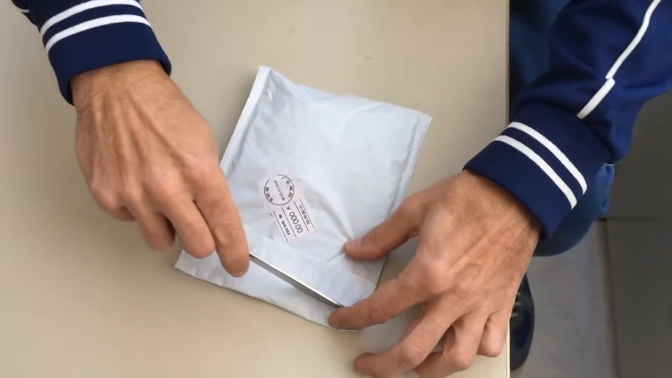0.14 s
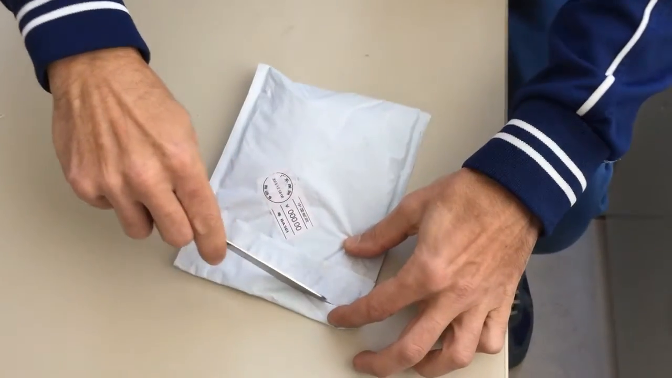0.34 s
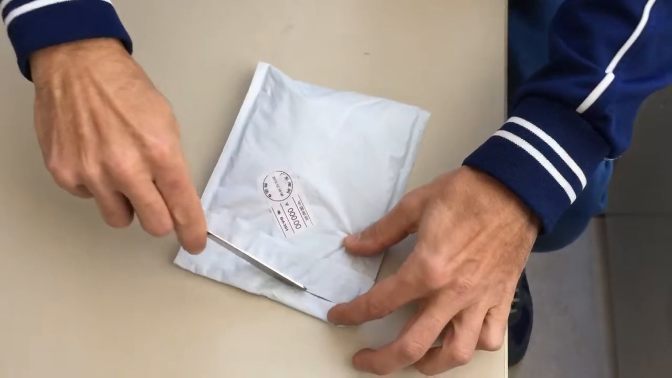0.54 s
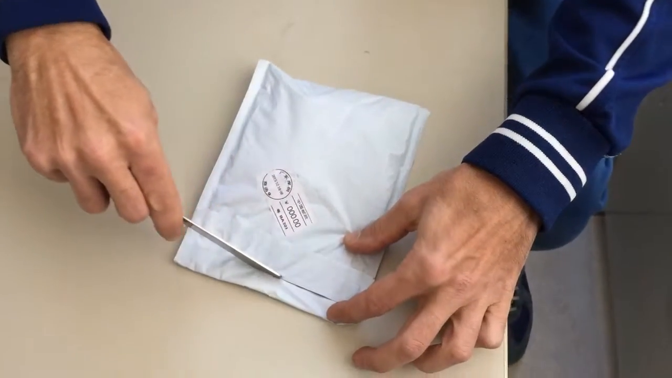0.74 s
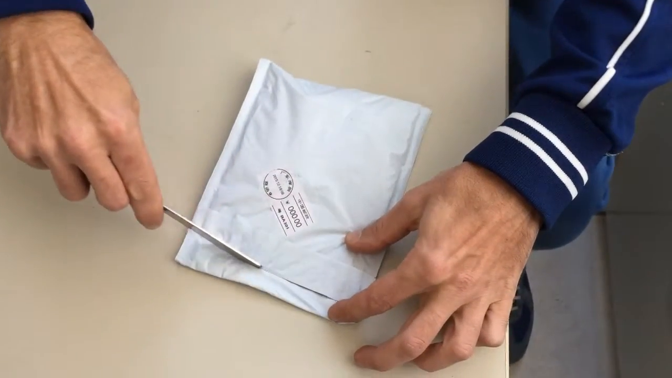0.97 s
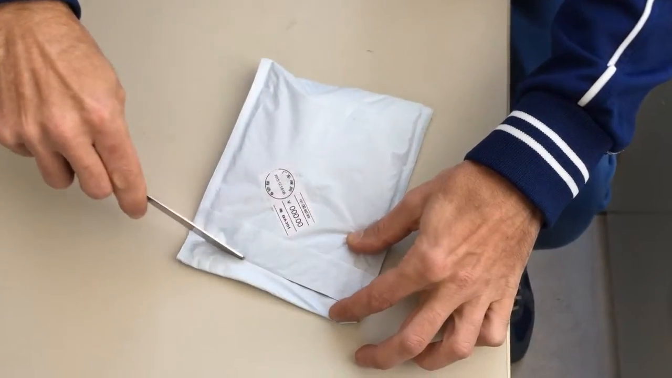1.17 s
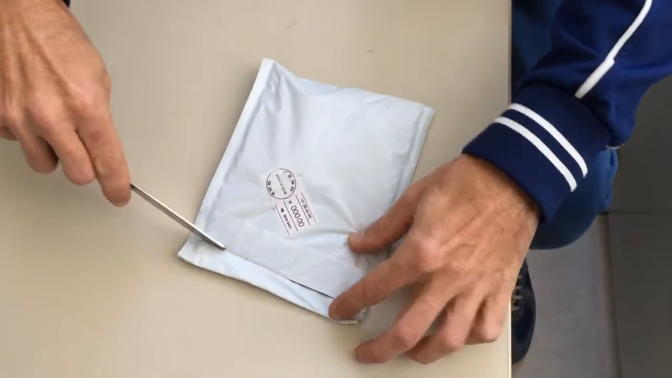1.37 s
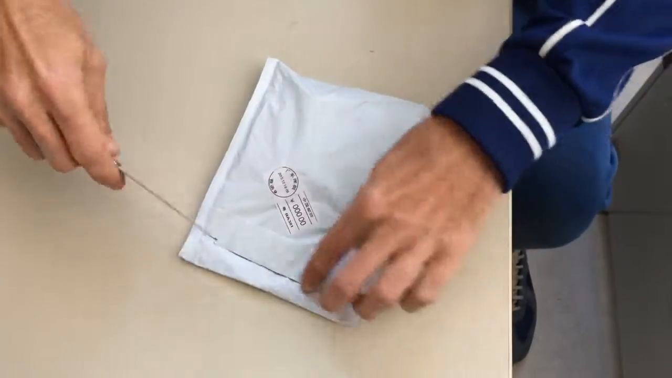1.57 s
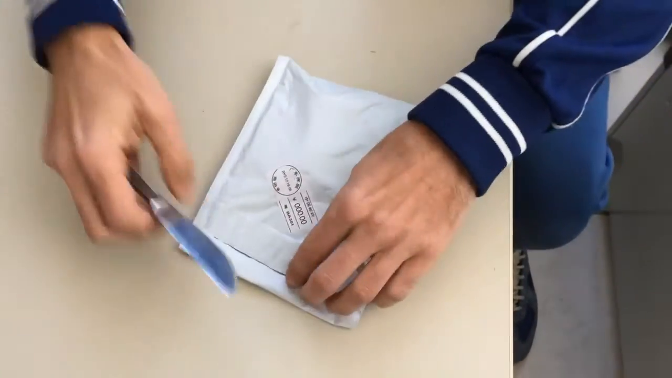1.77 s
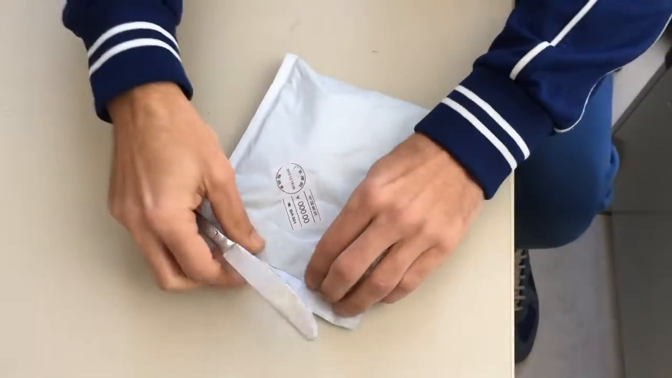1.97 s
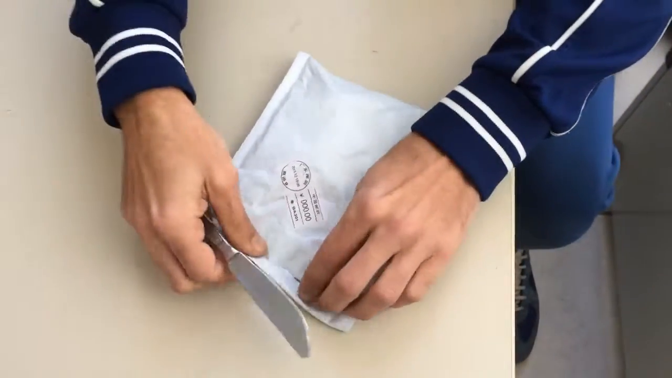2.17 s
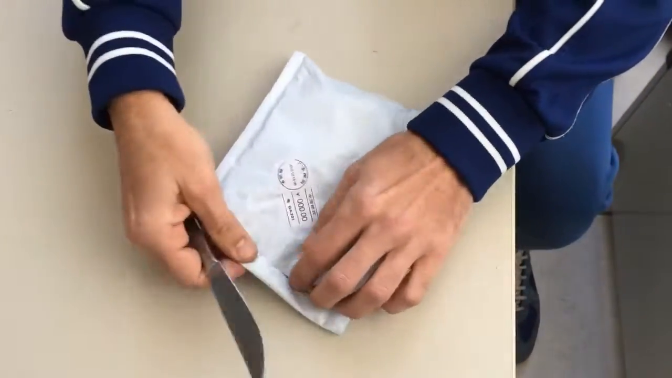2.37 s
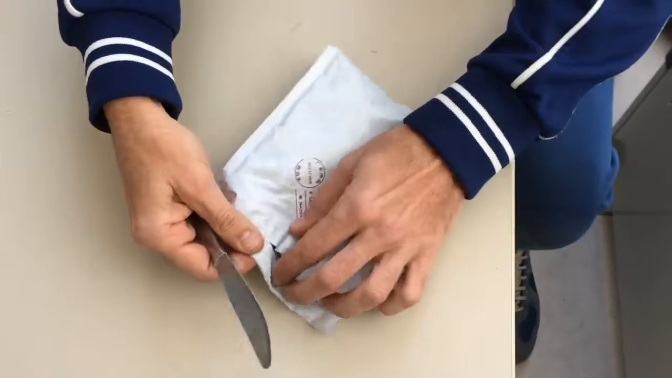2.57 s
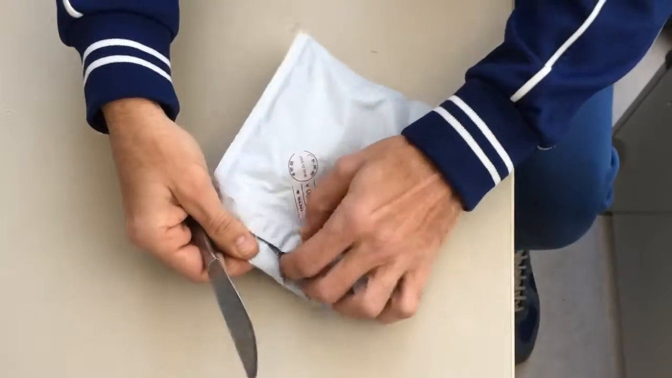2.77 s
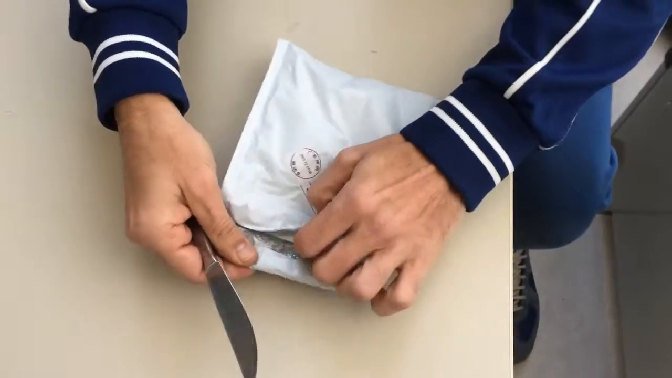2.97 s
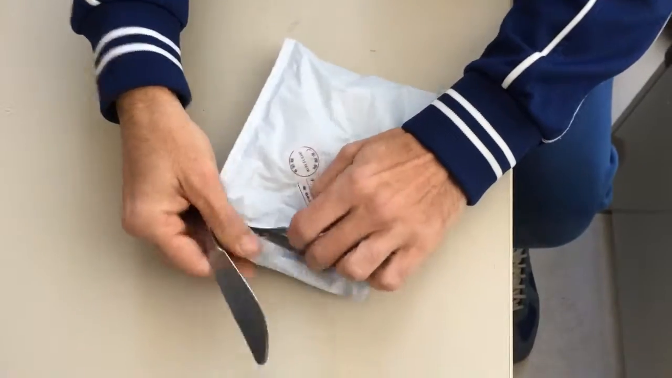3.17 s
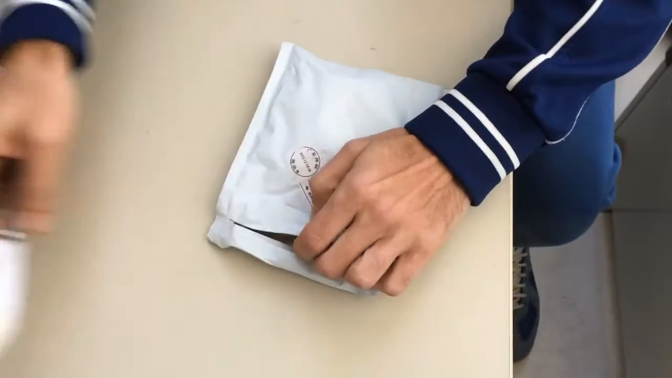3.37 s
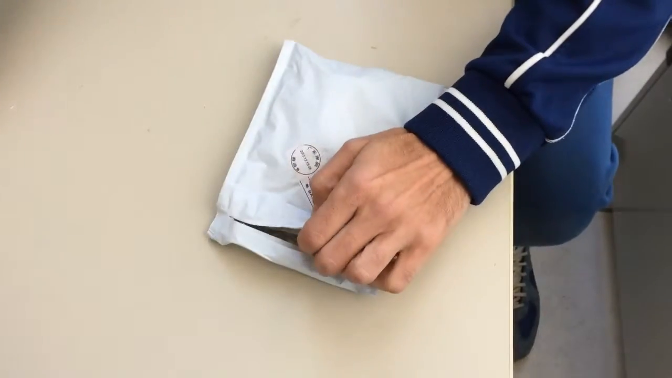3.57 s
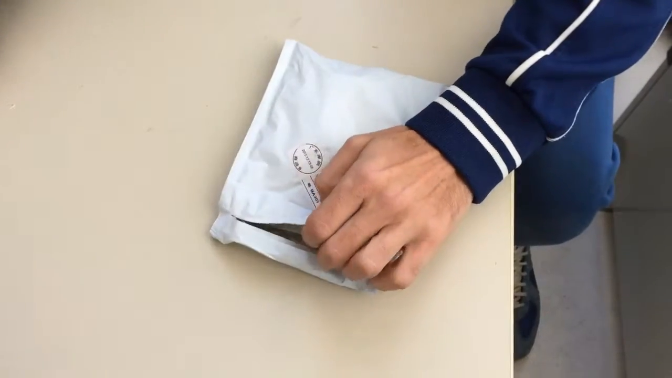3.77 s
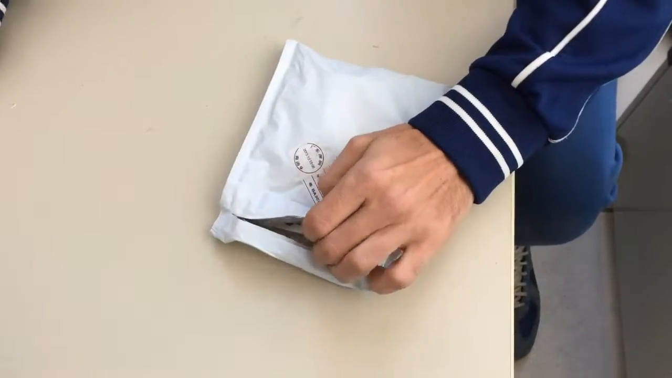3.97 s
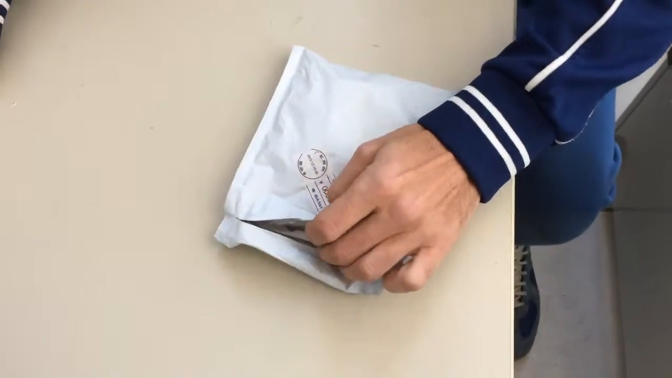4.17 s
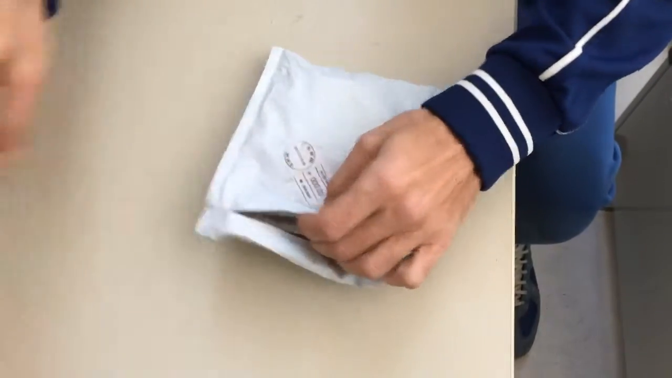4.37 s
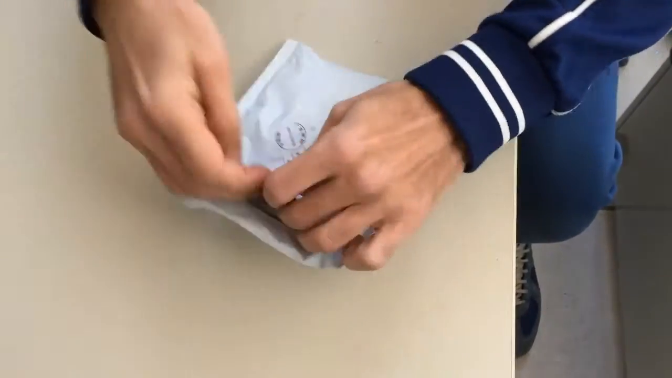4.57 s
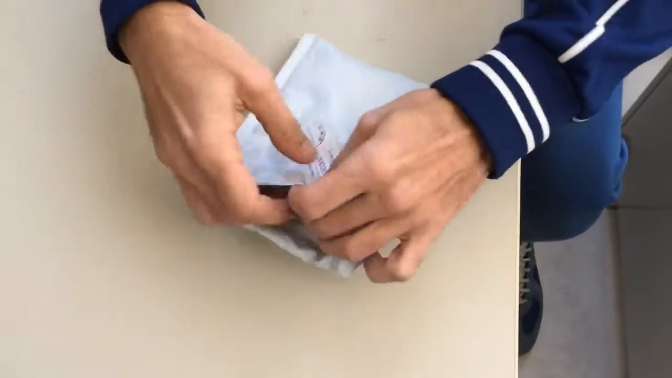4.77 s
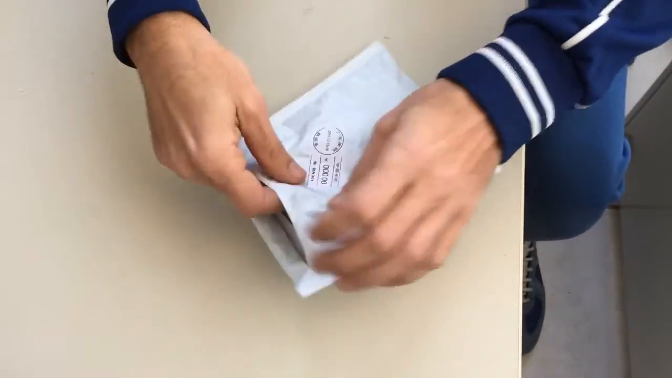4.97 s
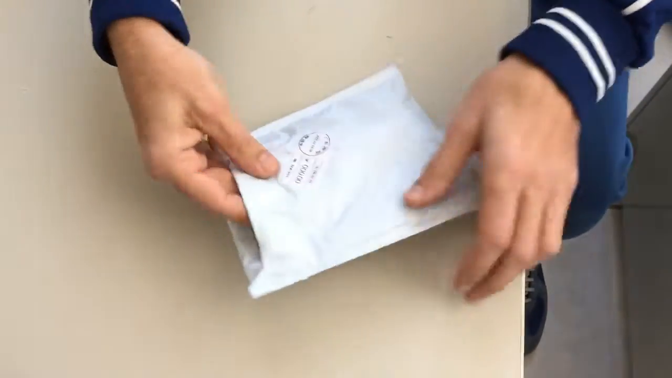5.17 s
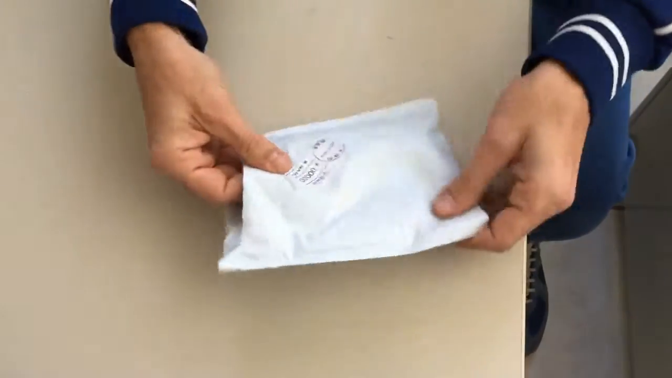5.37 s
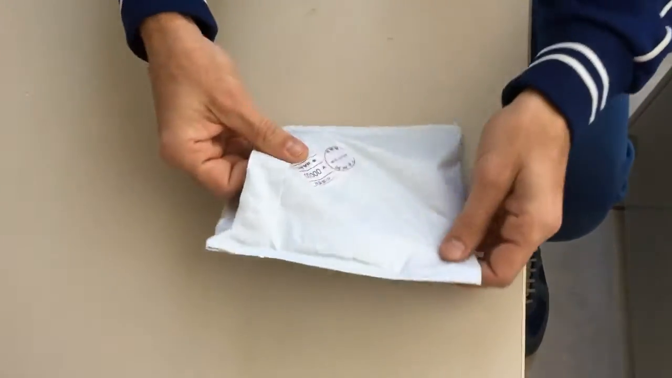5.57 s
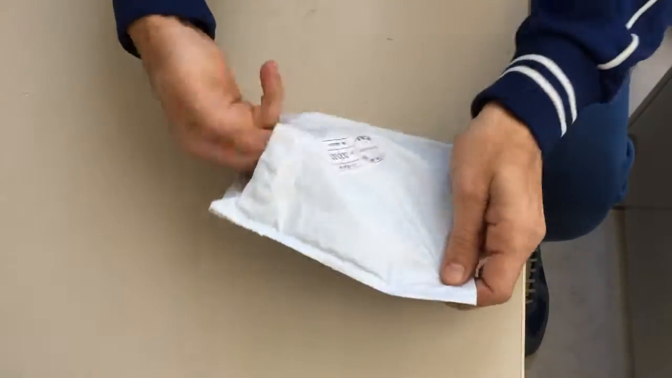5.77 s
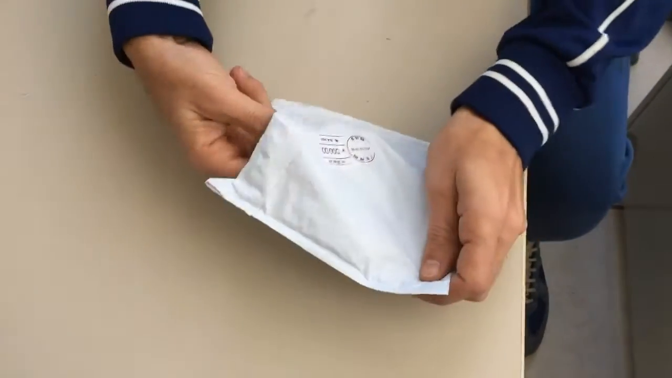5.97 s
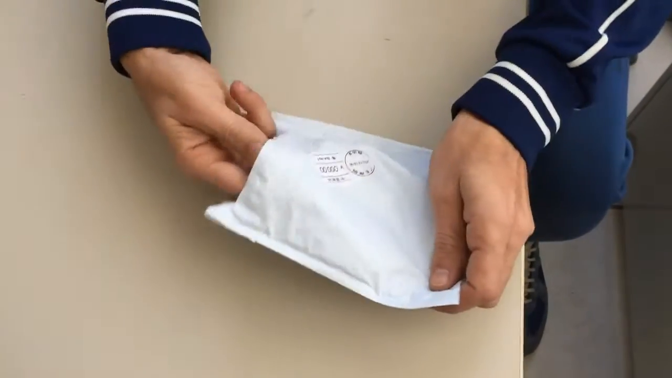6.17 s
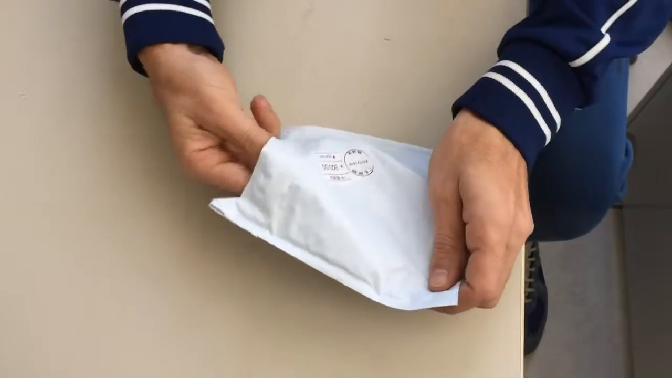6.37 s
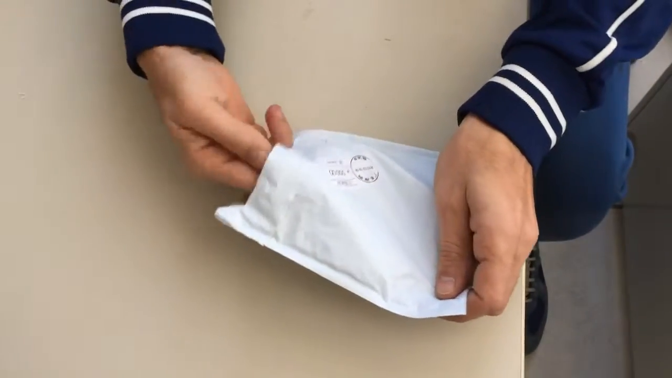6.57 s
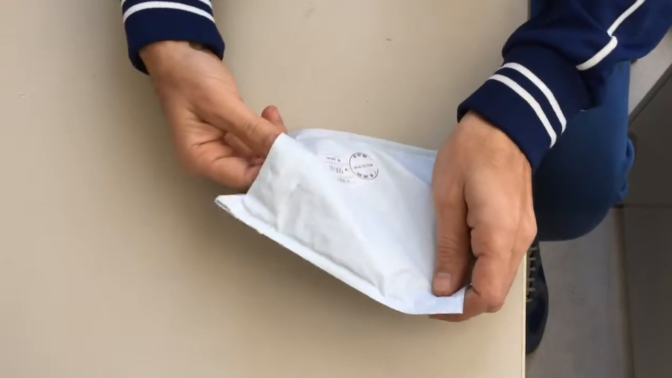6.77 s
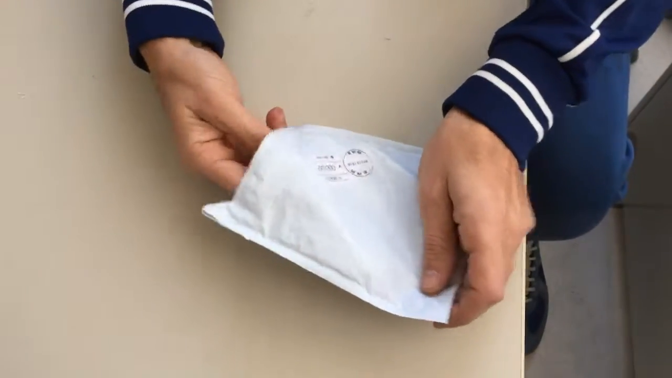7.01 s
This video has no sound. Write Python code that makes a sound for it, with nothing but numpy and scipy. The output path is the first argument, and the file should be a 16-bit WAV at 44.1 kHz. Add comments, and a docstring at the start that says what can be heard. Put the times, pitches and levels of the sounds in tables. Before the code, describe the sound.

Close up in a small hard room, a table knife slits a padded plastic envelope with faint rasps and tiny ticks. Hands then pull the film open with sharp, dense crackles. A near-quiet gap follows, broken by light taps and a hard, bright clack as the knife lands on the desk. Looser, fuller crinkling resumes and thins out as a hand feels inside. A faint low hum throbs beneath.

```python
"""Slitting a padded plastic envelope

Hands slit the envelope on a desk, lay the table knife down with a few taps and a clack and reach inside.
The blade rasps along the seam by stick-slip. Tiny creases crackle as they buckle and larger ones snap,
with a deeper colour once the film is open and slack. Struck steel and desk top ring as sums of damped modes;
each tap of the knife also gets a click made like a snap.
A small hard room answers with dense decaying reflections, over a low throbbing hum of two beating tones."""
import sys
import numpy as np
from scipy import signal
from scipy.io import wavfile
from scipy.ndimage import uniform_filter1d

SR = 44100
rng = np.random.default_rng(int(sys.argv[2]) if len(sys.argv) > 2 else 0)


def generate_wav(signal):
    """Clip the signal to [-1, 1] and save it as 16-bit WAV at the path in sys.argv[1]."""
    frames = np.transpose(np.atleast_2d(signal))
    scaled = np.clip(frames, -1, 1) * 32767
    pcm = np.round(scaled).astype(np.int16)
    wavfile.write(sys.argv[1], SR, pcm)


N = 310464

# relative spectrum of the open, slack film: [f/Hz, level/dB]
SLACK_FILM = [(150, -18.5), (350, -14.5), (550, -13.5), (800, -8.5), (1000, -5), (1500, -1), (2100, 1.5),
              (3200, -10), (4200, -11), (4800, -11), (6000, -6), (8000, -15.5), (10500, -19), (13000, -17),
              (16000, -23.5)]
# every move swells up to its start and is released after its length
SWELL_DB_PER_S, RELEASE_DB_PER_S = 458, 258


def gain_of(db):
    """Amplitude ratio from its logarithmic level in decibels."""
    return 10 ** (np.asarray(db) / 20)


def evened(x):
    """Normalisation by mean power, to rms 1."""
    return x / np.sqrt(np.mean(x ** 2) + 1e-20)


def peaked(x):
    """Normalisation by the largest excursion, to peak 1."""
    return x / (abs(x).max() + 1e-20)


def read(points, hz):
    """Linear interpolation of a curve on a log-frequency axis."""
    f, value = np.transpose(points)
    return np.interp(np.log(hz + 1), np.log(f + 1), value)


def follow(rows):
    """Linear interpolation in time: each column of a curve table at every sample."""
    s, *columns = np.transpose(rows)
    return [np.interp(np.arange(N) / SR, s, column) for column in columns]


def add(mix, s, sound):
    """Superposition: adds a sound to the mix, in place, from time s."""
    part = mix[max(round(s * SR), 0):][:len(sound)]
    part += sound[:len(part)]


def colour(x, points, size=4096):
    """Minimum-phase filtering: a causal filter of the given spectrum keeps the sharp front of a click."""
    log_gain = np.log(gain_of(read(points, abs(np.fft.fftfreq(size, 1 / SR)))))
    # the Hilbert transform of the log gain supplies the phase
    response = np.exp(np.conj(signal.hilbert(log_gain)))
    impulse = np.fft.ifft(response).real
    return signal.oaconvolve(x, impulse)[:len(x)]


def band(x, edge_hz, kind, order=4):
    """Band limiting by a Butterworth low-pass or high-pass."""
    sections = signal.butter(order, edge_hz, kind, fs=SR, output="sos")
    return signal.sosfilt(sections, x)


def burst(t60, size=1024):
    """Exponential decay: noise that falls by 60 dB in t60 seconds."""
    return rng.standard_normal(size) * gain_of(-60 * np.arange(size) / SR / t60)


def ring(modes, size=16384):
    """Modal superposition: damped sines struck together."""
    t = np.arange(size) / SR
    return sum(gain_of(db - 60 * t / t60) * np.sin(2 * np.pi * hz * t) for hz, db, t60 in modes)


def steadied(x, seconds):
    """Automatic gain: evens out the slow level near 1 and leaves the grain."""
    power = abs(uniform_filter1d(x ** 2, int(seconds * SR)))
    return x / np.sqrt(power + 1e-3 * np.mean(x ** 2))


def clustering(spread_db, seconds):
    """Clustering of events: a random gain that wanders slowly around 1."""
    return gain_of(spread_db * evened(uniform_filter1d(rng.standard_normal(N), int(seconds * SR))))


def impulses(rate_per_s, spread_db, largest):
    """Poisson process: impulses at random times, of random sign and size."""
    size = gain_of(spread_db * np.minimum(rng.exponential(1, N), largest))
    happens = rng.random(N) < rate_per_s / SR
    return size * happens * rng.choice([-1, 1], N)


def flutter(hz, cycles, size=1024):
    """Transient resonance: a patch of film swells into a few swings and dies."""
    turns = hz * np.arange(size) / SR
    return peaked(turns * np.exp(-turns / cycles) * np.sin(2 * np.pi * turns))


def tinted(x, spread_db, count=6):
    """Irregular radiation: every event radiates the treble with its own random spectrum."""
    levels_db = spread_db * rng.standard_normal(count)
    points = np.column_stack([np.geomspace(3000, 16000, count), levels_db])
    return evened(colour(x, points, size=256))


def wander(x, spread_db, hold_s, count=7):
    """Shifting radiation: each stretch of treble varies by itself as contact moves from crease to crease."""
    hz, t, z = signal.stft(x, SR, nperseg=256)
    noise = rng.standard_normal((count, len(t)))
    drift = evened(uniform_filter1d(noise, max(int(hold_s / t[1]), 1), axis=1))
    centres = np.geomspace(3000, 16000, count)
    # overlapping triangular weights spread each drift around its centre
    share = np.transpose([np.interp(hz, centres, row) for row in np.eye(count)])
    return signal.istft(z * gain_of(spread_db * share @ drift), SR, nperseg=256)[1][:len(x)]


def swell(start, length):
    """Envelope of one move: exponential growth, a level hold and exponential release."""
    age = np.arange(N) / SR - start
    rise_db = SWELL_DB_PER_S * np.maximum(-age, 0)
    release_db = RELEASE_DB_PER_S * np.maximum(age - length, 0)
    return gain_of(-rise_db - release_db)


def background(drone_hz=113.5, drift_hz=2.48, drift_s=0.532, air_db=-64.5):
    """Beating: a drone drifts against steady hum tones, so their sum throbs in the still air."""
    # steady hum: [f/Hz, rms level/dB]
    hum_tones = [(119.8, -59.5), (213, -76.5)]
    # the drone: [t/s, rms level/dB]
    drone_levels = [(0, -49.5), (.3, -60), (1.2, -63.5), (1.55, -55.5), (2, -77), (2.85, -53.5), (3.2, -75),
                    (4.4, -70), (5, -55), (5.5, -57.5), (6, -60), (7.04, -71)]
    # relative spectrum of still room air: [f/Hz, level/dB]
    air_spectrum = [(20, -70), (40, -36), (57, 9.5), (72, -7.5), (100, -1.5), (150, -2.5), (210, -13),
                    (300, -12.5), (500, -24.5), (1000, -23), (2000, -21), (4000, -28.5), (8000, -31),
                    (16000, -34.5)]
    t = np.arange(N) / SR
    drift = evened(uniform_filter1d(rng.standard_normal(N), int(drift_s * SR)))
    drone_turns = np.cumsum(drone_hz + drift_hz * drift) / SR
    hum = sum(gain_of(db) * np.sin(2 * np.pi * (hz * t + rng.random())) for hz, db in hum_tones)
    drone = gain_of(follow(drone_levels)[0]) * np.sin(2 * np.pi * drone_turns)
    air = gain_of(air_db) * evened(colour(rng.standard_normal(N), air_spectrum))
    return np.sqrt(2) * (hum + drone) + air  # a sine of rms 1 peaks at sqrt(2)


def room(x, wet_db, damp_hz, first_s=0.00337, size=256):
    """Reverberation: dense reflections of random sign, duller above damp_hz, each band with its own decay."""
    # reverberation time of the room: [f/Hz, t60/s]
    decay_times = [(150, .36), (400, .37), (1100, .37), (2700, .35), (5000, .3), (8000, .25), (14000, .19)]
    t = np.arange(SR) / SR
    arrives = (rng.random(SR) < 4000 / SR) * (t > first_s)
    reflections = rng.choice([-1., 1.], SR) * arrives
    hz, frame_s, z = signal.stft(reflections, SR, nperseg=size)
    decay = gain_of(-60 * frame_s / read(decay_times, hz)[:, None])
    tail = signal.istft(z * decay, SR, nperseg=size)[1]
    tail = band(tail / np.linalg.norm(tail), min(damp_hz, SR / 3), "low", order=1)
    return gain_of(wet_db) * signal.fftconvolve(x, tail)[:N]


def desk(pad_hz=430):
    """Soft impact: hand and knife handle knock modes of the desk top, rounded by the flesh of the hand."""
    # bumps on the desk: [t/s, peak level/dB]
    bumps = [(1.994, -47), (2.029, -48), (3.332, -47.5), (3.849, -41), (4.187, -35.5), (4.238, -42.5),
             (4.272, -43), (4.336, -30), (5.501, -45.5), (5.681, -45.5), (6.137, -48)]
    # modes of the desk top: [f/Hz, relative level/dB, t60/s]
    desk_modes = [(86, 6, 0.11), (132, 11.5, 0.075), (234, 11.5, 0.045), (300, 5.5, 0.12), (382, -15, 0.17),
                  (523, -10, 0.041), (700, 3, 0.02)]
    knock = band(ring(desk_modes), 60, "high", order=2)
    knock = peaked(band(knock, pad_hz, "low", order=2))
    out = np.zeros(N)
    for s, db in bumps:
        add(out, s, gain_of(db) * knock)
    return out


def shoves():
    """Sliding friction: the padding scuffs dully on the desk as the hand slides the envelope."""
    # slides of the envelope: [start t/s, length/s, rms level/dB]
    slides = [(1.99, 0.026, -60.5), (2.596, 0.022, -65), (3.306, 0.03, -70), (5.673, 0.017, -66),
              (5.79, 0.075, -67), (6.11, 0.045, -62.5), (6.565, 0.12, -65)]
    # relative spectrum of the soft scuff: [f/Hz, level/dB]
    scuff_spectrum = [(100, -18), (220, -2), (350, 0), (600, -3.5), (900, -5), (1500, -14), (4000, -45)]
    scuff = evened(colour(rng.standard_normal(N), scuff_spectrum))
    return scuff * sum(gain_of(db) * swell(start, length) for start, length, db in slides)


def taps(grit=0.27, grit_t60=0.0053):
    """Light impact: a gritty contact pulse excites modes of the knife, which pings."""
    # light touches of the knife: [t/s, peak level/dB]
    touches = [(1.7804, -40), (3.8478, -32.5), (4.186, -43)]
    # modes in a light touch: [f/Hz, relative level/dB, t60/s]
    tip_modes = [(2470, -9, 0.012), (3200, -5, .006), (3580, -1, .005), (4100, 1, 0.0069),
                 (6160, -17, .005)]
    out = np.zeros(N)
    for s, db in touches:
        contact = signal.unit_impulse(1024) + grit * burst(grit_t60)
        ping = signal.oaconvolve(contact, ring(tip_modes, size=4096))
        add(out, s, gain_of(db) * peaked(ping))
    return out


def knife(crack_db=-3, crack_t60=0.0038, grit=0.092):
    """Hard impact: steel meets the desk with a crack and rings in modes that the desk soon damps."""
    # the knife lands, chatters and settles: [t/s, peak level of the ringing/dB before the beaming]
    clacks = [(4.3339, -16), (4.3351, -9.5), (4.3369, -15.5), (4.3385, -25)]
    # modes of the knife on the desk: [f/Hz, relative level/dB, t60/s]
    knife_modes = [(1100, -4, 0.0099), (1230, -10, 0.042), (1260, -4.5, 0.02), (1514, 4, 0.042),
                   (1594, -1, 0.024), (1770, 0, 0.016), (1920, -6, 0.026), (2290, -7, 0.017),
                   (2730, -3, 0.019), (3420, -8, .007), (3870, -7.5, 0.008), (4430, 4, 0.016),
                   (4430, 2, .006), (5150, -11, 0.016), (5590, -12, 0.025), (6370, -17, 0.016),
                   (6620, -17, .021), (9870, -21, .031), (12200, -12.5, 0.05), (12700, -16, 0.052),
                   (13840, -22, 0.071)]
    # relative spectrum of the crack of steel on the desk: [f/Hz, level/dB]
    crack_spectrum = [(30, -54), (150, 0.5), (220, 5.5), (400, 1), (600, -4.5), (850, -4), (1150, 6),
                      (1700, -11.5), (2200, 6), (3200, -9.5), (4500, -11), (5500, -11.5), (9000, -14.5),
                      (14000, -10), (16000, -27)]
    # at the point of contact, groups of neighbouring modes swing in opposite directions
    steel = evened(sum((-1) ** (k // 3) * ring([mode]) for k, mode in enumerate(knife_modes)))
    out = np.zeros(N)
    for s, db in clacks:
        contact = signal.unit_impulse(len(steel)) + grit * burst(crack_t60, size=len(steel))
        crack = evened(colour(contact, crack_spectrum))
        add(out, s, gain_of(db) * (steel - gain_of(crack_db) * crack) / abs(steel).max())
    return band(out, 110, "high", order=3)


def blade(slips_per_s=520, spread_db=5.0, lip_db=2, lip_t60=0.017, catch_db=4, catch_s=.012):
    """Stick-slip: the blade catches and slips in the seam and rings stretched film and the lip of the slit."""
    # strokes along the seam: [start t/s, length/s, rms level/dB, lip f/Hz]
    strokes = [(0.13, 0.06, -66, 1940), (0.333, .12, -71, 2410), (0.503, 0.16, -65, 2270),
               (0.677, 0.19, -60.5, 2470), (0.94, 0.031, -60, 3350), (1.003, 0.063, -69, 2570),
               (1.14, 0.17, -65, 2340), (1.56, .06, -64.5, 2340)]
    # modes of the stretched seam: [f/Hz, relative level/dB, t60/s]
    seam_modes = [(1990, 1, 0.013), (4230, -7, 0.0036), (6100, 0, 0.0036), (9100, -14, .005)]
    catches = clustering(catch_db, catch_s)
    slips = impulses(catches * slips_per_s, spread_db, largest=2.6)
    out = np.zeros(N)
    for start, length, db, hz in strokes:
        modes = seam_modes + [(hz, lip_db, lip_t60)]
        resonance = band(ring(modes, size=1024), 1500, "high", order=2)
        rasp = signal.oaconvolve(slips, resonance)[:N]
        out += gain_of(db) * swell(start, length) * steadied(rasp, .09)
    return out


def snaps_and_clicks(cycles=0.85, flex_db=-7, shudder_t60=.024, tick_t60=0.0064, tick_db=11, second_db=-9,
                     tick_edge_hz=17000, dulling=0.29):
    """Snap-through buckling: a few cycles of one pitch, a shudder and a double tick, also for knife clicks."""
    # large creases, and the click of the knife's light touches at 1.78, 3.848 and 4.186 s:
    # [t/s, peak level/dB, pitch f/Hz, tick brightness/dB before tick_db is added]
    events = [(.091, -39, 3440, -15), (0.164, -44, 1850, -31), (.268, -37.5, 2220, -9.5),
              (.347, -32, 2290, -20), (.36, -32, 2240, -30), (.377, -34, 2000, -40),
              (0.416, -41, 1900, -27), (.452, -39.5, 2440, -22), (.47, -33.5, 2330, -3),
              (.482, -45, 2300, -8), (.59, -45, 2090, -25), (.645, -45.5, 1700, -25),
              (.679, -43, 2100, -16), (.686, -33, 2040, -6), (0.712, -39, 2110, -13), (.753, -46, 5500, -7),
              (.795, -38, 2200, -10), (0.814, -45, 2100, -20), (.855, -33, 2000, -9),
              (.933, -32, 2590, -6.5), (.954, -36, 1940, -15), (1.001, -35, 2130, -24),
              (1.005, -26.5, 2160, -6.5), (1.025, -39, 2220, -19), (1.038, -36.5, 2000, -17),
              (1.25, -32, 5600, -35), (1.301, -33, 2480, -16), (1.304, -36.5, 7000, 2),
              (1.335, -37, 5400, -6), (1.339, -24.5, 2720, 1), (1.361, -43, 2200, -12),
              (1.369, -44, 2000, -12), (1.612, -39, 2100, -18), (1.622, -41, 2400, -10),
              (1.641, -38.5, 1200, -10.5), (1.723, -39.5, 2480, -24), (1.726, -31.5, 2460, -18.5),
              (1.78, -32.5, 3730, -4), (1.84, -36, 2000, -6), (1.857, -37, 2000, -12),
              (1.907, -40, 1690, -18), (1.959, -34, 1870, -13), (2.03, -35, 2400, -20),
              (2.04, -27, 2340, -8), (2.067, -33, 1750, -28), (2.088, -34, 2600, -10),
              (2.099, -20, 2610, -16), (2.112, -32, 2480, -27), (2.137, -19, 2560, -5.5),
              (2.139, -20.5, 2550, -15), (2.155, -19, 2320, -10), (2.158, -30.5, 1670, -16),
              (2.221, -24.5, 2050, -15), (2.283, -32, 2460, -22), (2.297, -33, 1490, -9),
              (2.315, -33.5, 1640, -10), (2.328, -35.5, 5700, -15), (2.358, -32, 1690, -7),
              (2.361, -24.5, 1580, -14.5), (2.383, -36, 1800, -3), (2.456, -34.5, 5760, -20),
              (2.462, -33, 1680, -27), (2.517, -41, 1920, -22), (2.561, -27, 1460, -3),
              (2.598, -33, 1300, -22), (2.609, -29.5, 1250, -11), (2.677, -26, 2100, -10.5),
              (2.682, -28.5, 2400, -1), (2.732, -34.5, 1290, -14), (2.764, -37, 1560, -14),
              (2.817, -36, 1700, -25), (2.855, -32.5, 2480, -20), (2.882, -32.5, 1590, -22),
              (2.902, -32.5, 5500, -6), (2.909, -27.5, 2300, -15), (2.929, -35, 1900, -20),
              (2.959, -36, 1820, -25), (2.988, -28.5, 1570, -9), (2.996, -28, 2000, -15),
              (3.013, -32.5, 1380, -20), (3.024, -34, 1500, -18), (3.037, -27.5, 1400, -18),
              (3.044, -26, 1700, -6), (3.06, -25.5, 2240, 1), (3.078, -31.5, 1470, -9),
              (3.111, -31.5, 2050, -28), (3.174, -33.5, 5830, -18), (3.185, -31, 5800, -22),
              (3.26, -29.5, 2290, -20), (3.316, -25, 1820, -13), (3.368, -37.5, 1330, -22),
              (3.38, -42, 1700, -17), (3.636, -42.5, 1850, -36), (3.848, -33.5, 3920, -12.5),
              (3.963, -38, 1230, -15), (4.059, -51, 7000, -4), (4.151, -32.5, 2250, -11.5),
              (4.186, -34, 2900, -21), (4.206, -31.5, 1800, -25), (4.265, -34.5, 1170, -4),
              (4.494, -36, 7600, -21), (4.695, -30.5, 1420, -14.5), (4.732, -42, 1000, -23),
              (4.747, -39, 6500, -14), (4.753, -27, 5330, -9), (4.787, -31.5, 1500, -32),
              (4.829, -35, 1500, -32), (4.842, -31, 1590, -5), (4.853, -34, 1350, -18),
              (4.887, -23, 1460, -37), (4.92, -33, 1580, -25), (4.958, -35, 5800, -20),
              (4.987, -26, 1570, -22), (5.005, -25.5, 1770, -22), (5.014, -27.5, 1700, -22),
              (5.023, -25, 1490, -27), (5.05, -23.5, 1590, -43), (5.068, -30, 1700, -10),
              (5.086, -26, 1990, -41), (5.127, -22, 1400, -11), (5.264, -34, 1610, -16),
              (5.272, -32, 1090, -20), (5.317, -48, 1710, -28), (5.335, -27, 960, -12.5),
              (5.371, -28, 1830, -16), (5.417, -26.5, 1320, -7.5), (5.473, -22.5, 1880, -2.5),
              (5.49, -24, 2000, -22), (5.499, -29, 1180, -22), (5.518, -22.5, 1010, -7.5),
              (5.52, -29, 1180, -13), (5.556, -27, 1500, 2), (5.641, -29, 1890, -6),
              (5.645, -30.5, 1620, -15), (5.676, -20.5, 1750, -2), (5.692, -28, 5600, -12),
              (5.731, -36, 1200, -28), (5.7362, -28, 1400, -30), (5.785, -33, 1310, -20),
              (5.797, -31, 2020, -18), (5.808, -26.5, 1640, -13), (5.813, -27.5, 1400, -8),
              (5.853, -26, 1680, -10.5), (5.884, -26, 1710, -9), (5.914, -36.5, 5500, -15),
              (5.941, -32, 5950, 2), (5.965, -31, 1790, -25), (5.992, -35, 1860, -10),
              (6.062, -32, 1590, -6), (6.084, -29, 1690, -11), (6.104, -30, 1770, -1),
              (6.126, -32, 1280, -11), (6.131, -19, 1770, -42), (6.268, -34, 1890, -29),
              (6.272, -37, 1840, -30), (6.302, -33, 1670, -10), (6.373, -33.5, 4520, -2),
              (6.39, -34, 4000, -15), (6.402, -36.5, 1490, -22), (6.411, -36, 1590, -22),
              (6.451, -37, 1740, -18), (6.468, -32, 2100, -25), (6.485, -38, 1700, -9),
              (6.503, -31.5, 2030, -17), (6.548, -30, 1390, -15), (6.576, -32, 1700, -17),
              (6.6, -31.5, 1530, -15), (6.627, -34, 2290, -21), (6.645, -36.5, 1800, -25),
              (6.677, -29, 1250, -17), (6.7, -40, 1900, -19), (6.715, -38, 1690, -13),
              (6.867, -36.5, 1590, -19), (6.894, -39.5, 1800, -28), (6.933, -38.5, 1250, -20),
              (6.953, -41, 5000, -24), (6.981, -33.5, 4870, -33), (7.007, -41, 4270, -22),
              (7.034, -38, 1900, -20)]
    # relative spectrum of the tick: [f/Hz, level/dB]
    tick_colour = [(500, -45), (2000, 0.0), (4000, 9.0), (6200, 12.5),
                   (8500, 3.5), (10500, 2.0), (14000, 3.0), (16000, 7.0)]
    out = np.zeros(N)
    for s, db, hz, bright_db in events:
        shudder = band(colour(burst(shudder_t60), SLACK_FILM), 2 * hz, "low", order=2)
        sheet = gain_of(flex_db) * peaked(shudder)
        steps = burst(tick_t60)
        add(steps, rng.uniform(0.001, 0.0043), gain_of(second_db) * burst(tick_t60))
        # a less bright event gives a duller tick as well as a weaker one
        edge_hz = np.clip(tick_edge_hz * gain_of(dulling * bright_db), 3000, 19000)
        tick = colour(tinted(steps, spread_db=3.5), tick_colour)
        tick = gain_of(bright_db + tick_db) * peaked(band(tick, edge_hz, "low", order=2))
        add(out, s, gain_of(db) * peaked(flutter(hz, cycles) + sheet + tick))
    return out


def effort(growth_db_per_s=1):
    """Power summation: moves with one shared envelope give the levels of sheet, fizz and sizzle."""
    # blade strokes, then finger grips, before the trims in rustle:
    # [start t/s, length/s, flexing sheet level/dB, fine fizz level/dB, top sizzle re fizz level/dB]
    moves = [(0.308, 0.058, -59, -64, -14), (0.462, 0.018, -62, -63.5, -14), (0.563, 0.1, -70, -78, -12),
             (0.671, 0.044, -61, -61.5, -7), (0.756, 0.12, -65, -63.5, -16), (0.923, 0.17, -64, -64.5, -10),
             (1.245, 0.1, -65, -62.5, -12), (1.598, 0.034, -58, -58.5, -1), (1.729, 0.034, -71, -59, -5),
             (1.843, 0.047, -59, -59, -2), (1.94, .06, -53, -57, -3), (2.088, 0.077, -52, -49, -7),
             (2.19, 0.14, -51.5, -56.5, -7), (2.307, .11, -52, -55, -3), (2.518, .04, -51.5, -53, 2),
             (2.591, 0.05, -48, -52.5, -5), (2.702, 0.088, -49.5, -53, 1.5), (2.836, .1, -51.5, -55, 0),
             (3.019, 0.06, -45, -51, -1), (3.137, 0.14, -60.5, -61.5, 1), (3.309, 0.028, -48, -55, -4),
             (4.138, 0.21, -56, -64, -5), (4.675, 0.08, -52.5, -55, 2), (4.835, 0.014, -48.5, -53, 6),
             (4.909, .05, -56, -53, 1), (4.978, 0.032, -42.5, -47, 3.5), (5.015, 0.074, -52, -59, -9),
             (5.1, 0.1, -61, -59, 2), (5.21, 0.023, -55.5, -55, 2), (5.258, .18, -52, -56, 1),
             (5.475, 0.03, -41, -47, -3), (5.552, 0.13, -54, -55, 3), (5.715, 0.061, -53.5, -57, -3),
             (5.784, 0.089, -45.5, -46.5, -3), (5.951, 0.045, -50.5, -53.5, 2),
             (6.066, 0.051, -43.5, -49.5, -1), (6.27, 0.06, -54.5, -61.5, -3), (6.382, 0.07, -53, -58, 1),
             (6.487, 0.084, -49.5, -55, 3), (6.573, 0.011, -46.5, -52, 5), (6.61, 0.076, -51.5, -55, -1),
             (6.789, 0.014, -54.5, -59, -3), (6.86, 0.2, -60, -66.5, -3)]
    # hands at rest on the film: the same three levels/dB
    resting_db = (-75, -75.5, -4)
    t = np.arange(0, N, 64) / SR

    def powers(sheet_db, fizz_db, sizzle_db):
        """Power as the square of amplitude, for the three levels."""
        return gain_of([[sheet_db], [fizz_db], [fizz_db + sizzle_db]]) ** 2

    power = powers(*resting_db) * np.ones(len(t))
    for start, length, *levels_db in moves:
        age = t - start
        rise_db = SWELL_DB_PER_S * np.maximum(-age, 0)
        growth_db = growth_db_per_s * np.maximum(age, 0)
        release_db = RELEASE_DB_PER_S * np.maximum(age - length, 0)
        power += powers(*levels_db) * gain_of(growth_db - rise_db - release_db) ** 2
    return [np.interp(np.arange(N) / SR, t, np.sqrt(p)) for p in power]


def rustle(per_s=680, spread_db=4.0, clump_db=3.0, clump_s=.014, cycles=0.99, tick_t60=0.01, split_hz=3300,
           sheet_db=-1.5, fizz_db=-0.2, rub_db=-8, hiss_db=-4, count=24):
    """Crackling noise: tiny creases buckle at random, tick and shake their patch, over hissing skin friction."""
    # looseness of the film: [t/s, slackness from 0 taut under the blade to 1 open and slack]
    slackness = [(0, 0.22), (.4, 0.14), (1.1, 0.11), (2, 0.53), (2.15, 0.035), (2.4, 0.76), (3.05, 0.76),
                 (4.2, 0.37), (4.8, 0.96), (5.9, 0.91), (7.04, 1)]
    # relative spectrum of the taut film: [f/Hz, level/dB]
    taut_film = [(150, -39), (500, -41), (800, -17), (1200, -9.5), (1600, -6), (2050, 0.5), (2600, 1),
                 (3200, -2.5), (4700, -7.5), (6200, -6), (7800, -10.5), (9300, -3.5), (11000, -19.5),
                 (13000, -3), (14500, -9), (16000, -21.5)]
    # one crease sets off its neighbours, so they come in clumps
    clumps = clustering(clump_db, clump_s)
    size = impulses(clumps * per_s, spread_db, largest=2.8)
    # only the patches under the fingers are at work, so the colour wanders
    first_patch = np.arange(N) * count // (SR // 2)
    patch = (first_patch + rng.integers(0, count - count // 4, N)) % count
    pitches = rng.permutation(np.geomspace(450, 3200, count))
    flex, ticks = np.zeros((2, N))
    for k, hz in enumerate(pitches):
        creases = size * (patch == k)
        flex += signal.oaconvolve(creases, np.sqrt(hz) * evened(flutter(hz, cycles)))[:N]
        ticks += signal.oaconvolve(creases, tinted(burst(tick_t60), spread_db=3.5))[:N]
    rub = gain_of(rub_db) * np.sqrt(clumps) * rng.standard_normal(N)
    hiss = gain_of(hiss_db) * np.sqrt(clumps) * rng.standard_normal(N)
    flex = band(evened(flex) + rub, split_hz, "low")
    ticks = band(evened(ticks) + hiss, split_hz, "high")
    ticks = wander(ticks, spread_db=2.2, hold_s=.025)
    slack = np.clip(follow(slackness)[0], 0, 1)
    sheet, fizz, sizzle = effort()
    # a light, sliding touch adds sizzle at the very top
    top = sizzle / fizz * band(ticks, 9600, "high", order=3)
    ticks = band(ticks, 7500, "low", order=3) + top
    out = np.zeros(N)
    for drive, level, trim_db in ((flex, sheet, sheet_db), (ticks, fizz, fizz_db)):
        film = (1 - slack) * colour(drive, taut_film) + slack * colour(drive, SLACK_FILM)
        out += level * gain_of(trim_db) * steadied(film, .07)
    return out


def scene():
    """Direct and reverberant fields: the envelope is close; the knife lands to the side and stirs the room more."""
    # the flat blade beams some of its modes straight at the listener: [f/Hz, level/dB]
    beam = [(800, -4.5), (1100, 4), (1600, -2.5), (2400, -1.5), (2860, 10.5), (3400, -2.5), (4000, 3),
            (4500, 6), (5500, -3.5), (16000, -2.5)]
    film = rustle() + blade()
    snapping = snaps_and_clicks()
    clack = knife()
    pings = taps()
    bumps = desk() + shoves()
    direct = film + snapping + colour(clack, beam) + pings + bumps
    echoes = room(film, wet_db=-4.5, damp_hz=4200)
    echoes += room(snapping, wet_db=-7.5, damp_hz=3550)
    echoes += room(clack, wet_db=1.74, damp_hz=4600)
    echoes += room(pings, wet_db=0, damp_hz=7000)
    echoes += room(bumps, wet_db=-5, damp_hz=2000)
    return (direct + echoes + background())[None]


def record(dry, edge_hz=16200):
    """Band limitation: a steep linear-phase low-pass ends the spectrum at edge_hz."""
    low_pass = signal.firwin(255, edge_hz, window=("kaiser", 9), fs=SR)
    return signal.oaconvolve(dry, low_pass[None], "same")


dry = scene()
out = record(dry)
generate_wav(out)
```